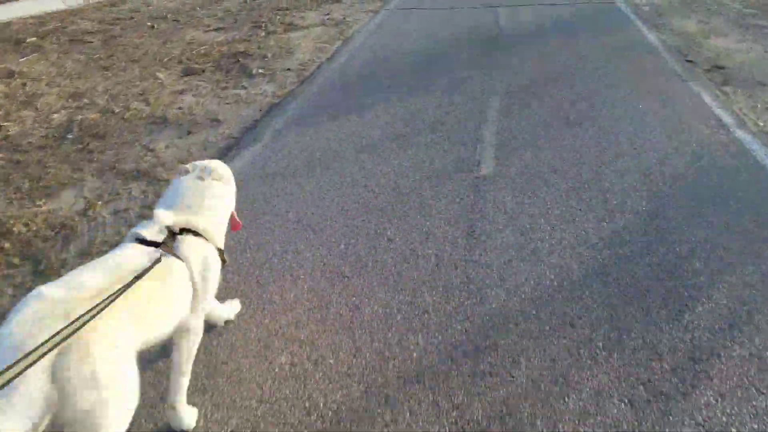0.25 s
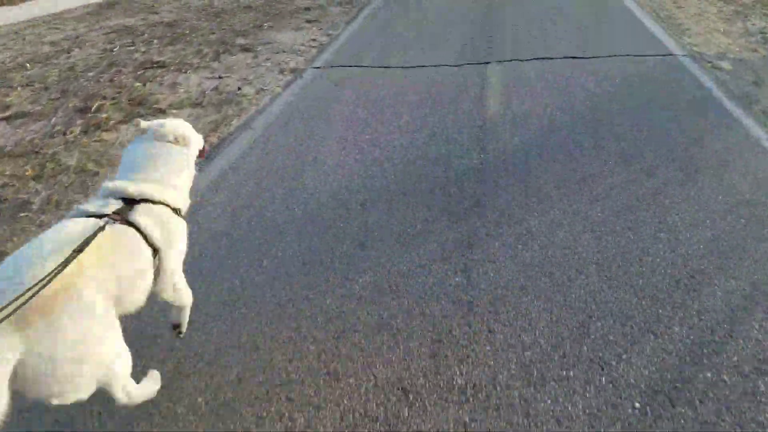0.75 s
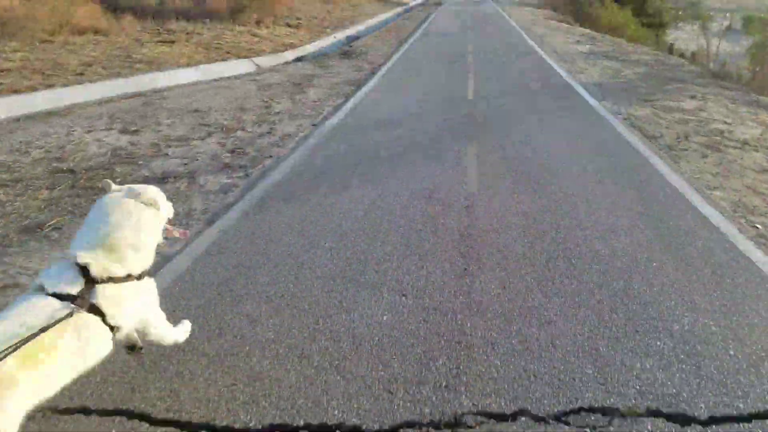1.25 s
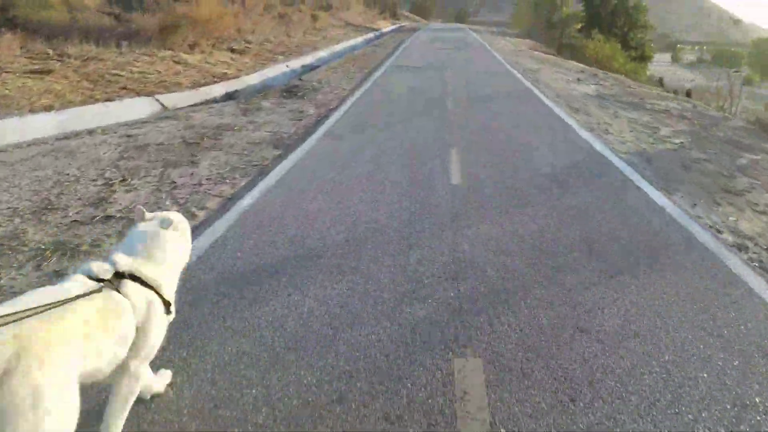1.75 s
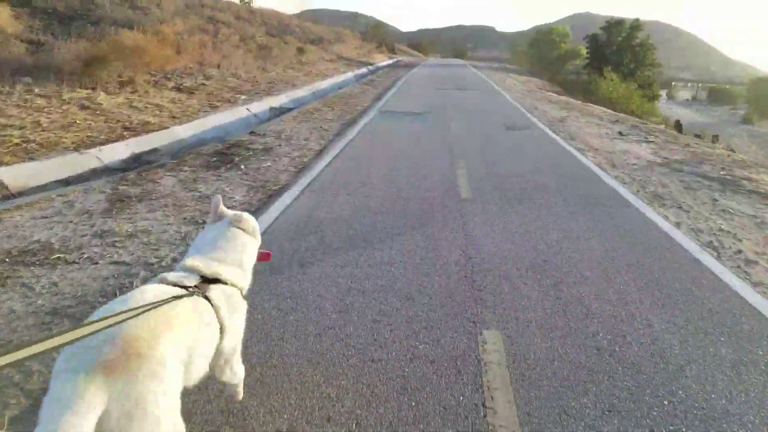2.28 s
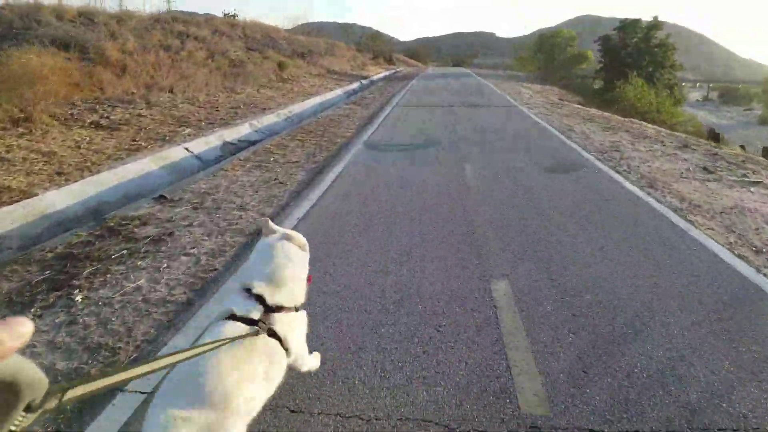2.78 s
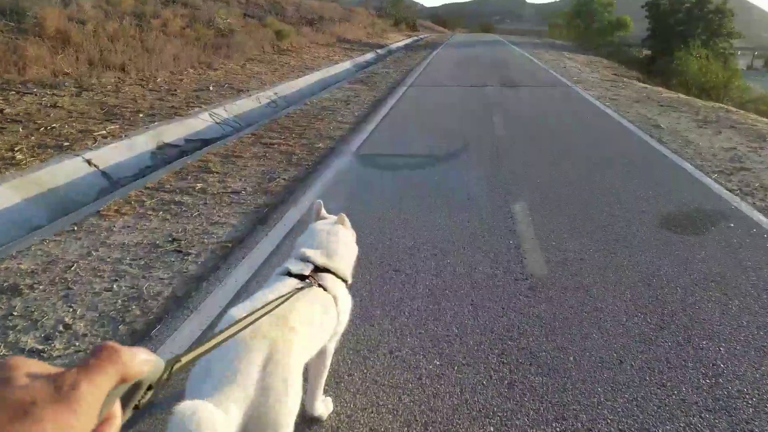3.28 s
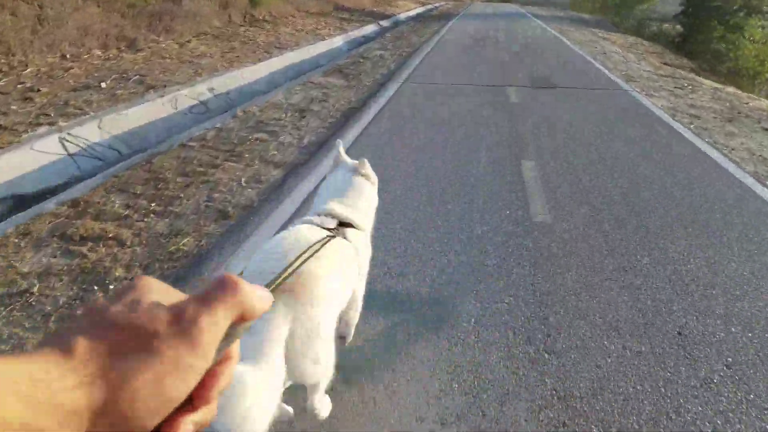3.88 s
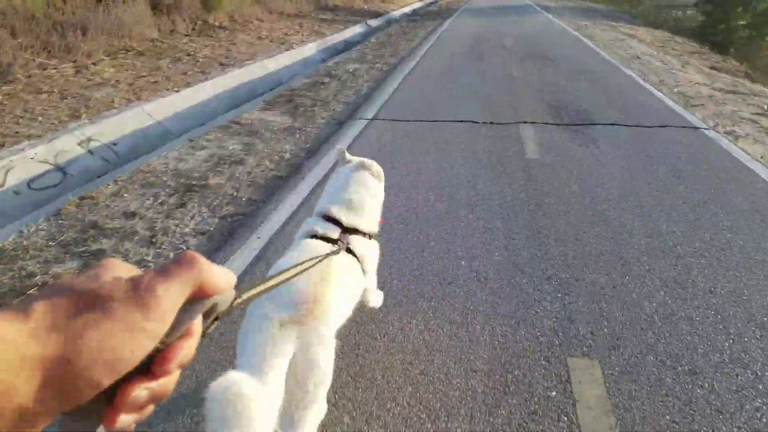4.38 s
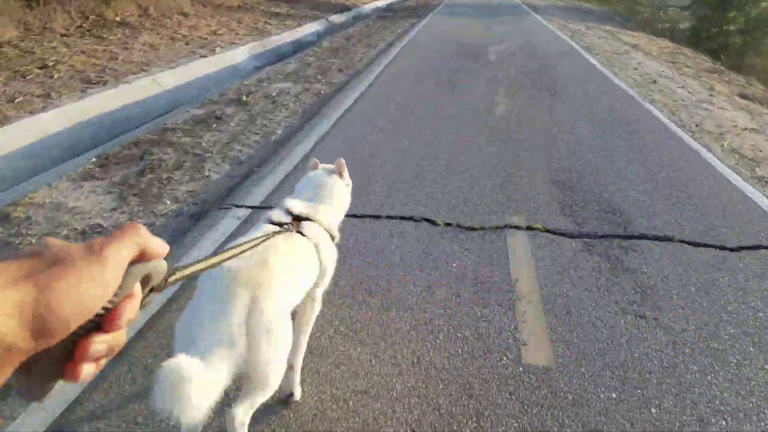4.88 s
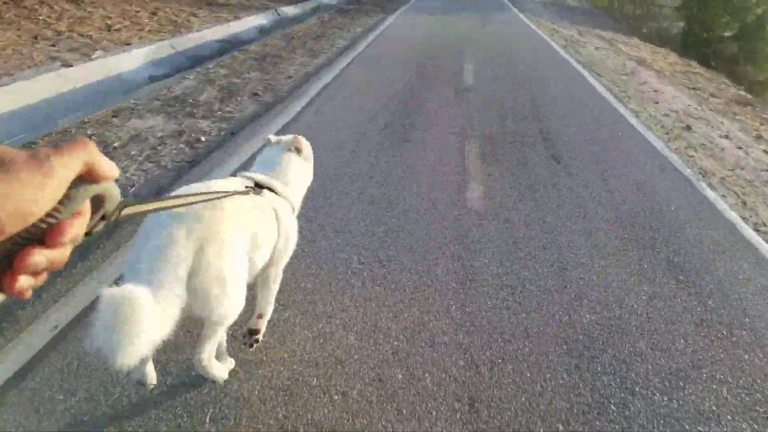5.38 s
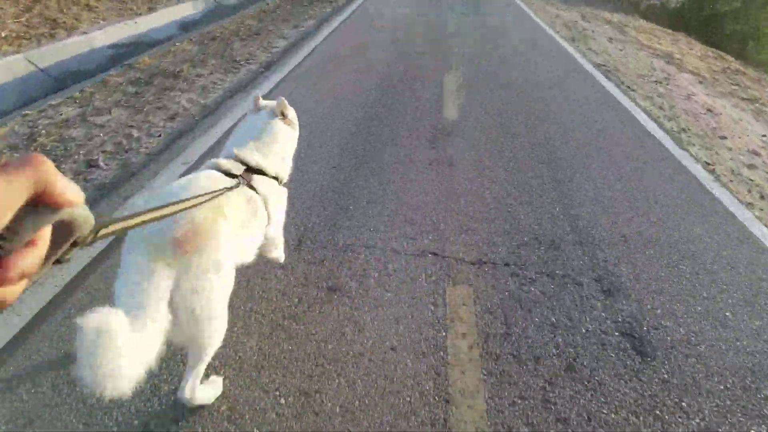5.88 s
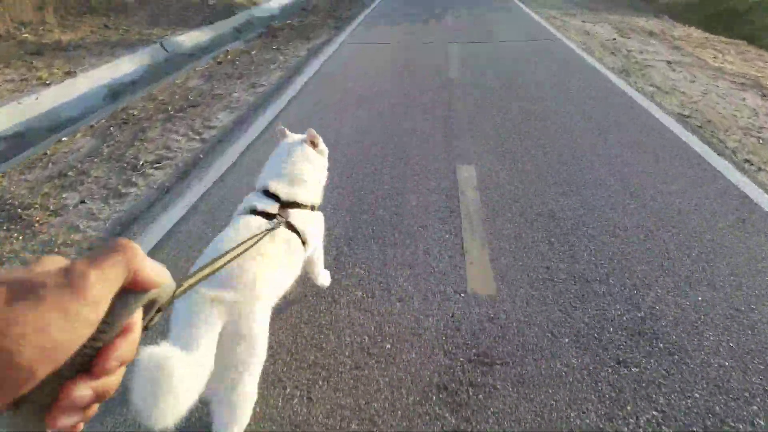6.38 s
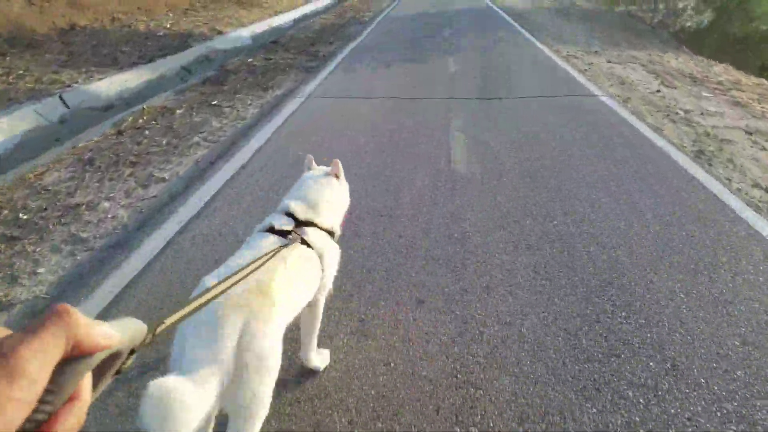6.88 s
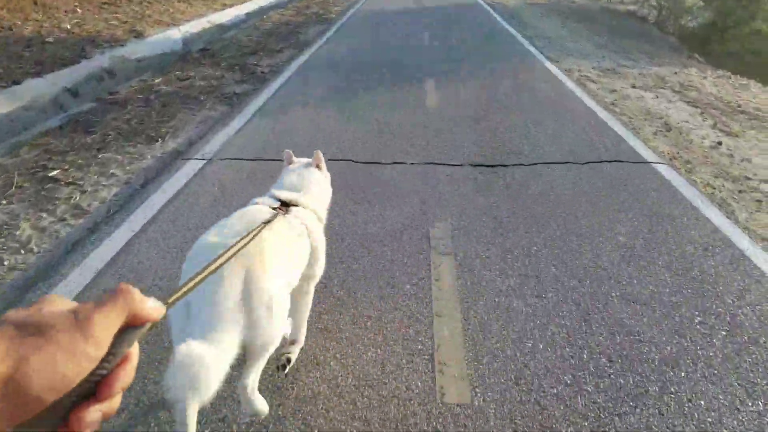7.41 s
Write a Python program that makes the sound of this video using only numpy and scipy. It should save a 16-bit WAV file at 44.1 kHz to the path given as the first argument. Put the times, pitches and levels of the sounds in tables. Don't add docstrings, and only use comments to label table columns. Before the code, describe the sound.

Longboard wheels rumble over coarse asphalt while gusty headwind thuds and crackles on the microphone, with small stone jolts, cracks and faint dog claws.

```python
import sys
import numpy as np
from scipy import signal
from scipy.io import wavfile
from scipy.ndimage import uniform_filter1d, minimum_filter1d

SR = 44100
rng = np.random.default_rng(int(sys.argv[2]) if len(sys.argv) > 2 else 0)


def master_out(mix):
    frames = np.transpose(np.atleast_2d(mix))
    ceiling = np.clip(frames, -1, 1)
    pcm = np.round(ceiling * 32767).astype(np.int16)
    wavfile.write(sys.argv[1], SR, pcm)


def voltage_ratio(decibels):
    exponent = np.asarray(decibels, float) / 20
    return 10 ** exponent


N = 337365
TIME = np.arange(N) / SR

# f/Hz, width/Hz, level/dB
DECK_MODES = [(225.2, 44, -2), (314, 98, -4.5), (447.7, 75.5, 1.5), (633, 106, -9.5), (772, 135, -14.5)]
# t/s, deck blow/dB, rattle/dB, time for the rattle to fall 60 dB/s
ROAD_CRACKS = [
    (0.735, -20, -22.5, 0.039),
    (0.7465, 8, -35.5, 0.069),
    (5.4975, -7, -28.5, 0.046),
    (5.503, 14.5, -33.5, 0.13),
    (5.512, -18, -31.5, 0.08),
    (5.652, 2, -40, 0.059),
    (5.673, 1.5, -47, 0.084),
]


def evened(x):
    return x / np.sqrt(np.mean(x ** 2, -1, keepdims=True) + 1e-20)


def read(points, hz):
    f, value = np.transpose(points)
    return np.interp(np.log(hz + 1), np.log(f + 1), value)


def curves(rows):
    s, *columns = np.transpose(rows)
    return np.array([np.interp(TIME, s, c) for c in columns])


def coloured(x, points, lo_hz, hi_hz):
    hz = abs(np.fft.fftfreq(8192, 1 / SR))
    log_gain = np.log(voltage_ratio(np.maximum(read(points, hz), -100)))
    taps = np.fft.ifft(np.exp(np.conj(signal.hilbert(log_gain)))).real[:4096]
    inside = np.mean(np.exp(2 * log_gain) * (hz > lo_hz) * (hz < hi_hz))
    return signal.oaconvolve(x, taps[None] / np.sqrt(inside), axes=1)[:, :N]


def resonate(x, hz, width):
    turn = np.exp(2j * np.pi * np.cumsum(hz * np.ones(N)) / SR)
    r = np.exp(-np.pi * width / SR)
    return 2 * (turn * signal.lfilter([1 - r], [1, -r], x / turn + 1e-18)).real


def lumps(per_s, channels):
    size = int(SR / per_s)
    noise = rng.standard_normal((channels, N))
    return evened(uniform_filter1d(uniform_filter1d(noise, size), size))


def bursts(s, db, t60, rise=0.00037):
    train = np.zeros(N)
    np.add.at(train, (np.array(s) * SR).astype(int), voltage_ratio(db))
    t = TIME[:SR // 4]
    return signal.oaconvolve(train, voltage_ratio(-60 * t / t60) * (1 - np.exp(-t / rise)))[:N]


def wavelets(rows, gain_db, cycles):
    out = np.zeros(N + SR)
    for (s, db, hz), turn in zip(rows, rng.random(len(rows))):
        u = np.arange(-cycles, 3.2 * cycles, hz / SR)
        at = max(int((s - cycles / hz) * SR), 0)
        reach = np.where(u < 0, cycles, 1.94 * cycles)
        swell = np.exp(-(2 * u / reach) ** 2)
        out[at:at + len(u)] += voltage_ratio(db + gain_db) * swell * np.cos(2 * np.pi * (u + turn))
    return out[:N]


def gust_strength(gusts):
    gusting = np.zeros(N)
    for s, length, db in gusts:
        span = slice(int(s * SR), int((s + length) * SR))
        gusting[span] += voltage_ratio(db) * signal.windows.tukey(span.stop - span.start, .7)
    return gusting


def wind():
    # t/s, left level/dB, right level/dB
    headwind = [(0.0, -30, -17.5), (0.55, -34.5, -23.5), (0.95, -10.5, -17), (1.2, -21, -18),
                (1.5, -15, -31.5), (1.85, -22.5, -16.5), (2.1, -19.5, -22.5), (2.5, -14, -22),
                (3.0, -16.5, -19), (3.6, -23, -25.5), (4.55, -21.5, -29), (5.35, -17, -14.5),
                (5.65, -16.5, -28.5), (5.95, -23.5, -16), (6.3, -13.5, -24), (6.6, -25, -17),
                (7.05, -30, -19), (7.5, -22, -22)]
    # f/Hz, level per Hz/dB
    buffet_colour = [(20, -18), (45, -4), (90, 2), (150, -1), (260, -4.5), (500, -12.5), (900, -23.5),
                     (2000, -73)]
    eddy_colour = [(150, 5), (400, 10.5), (1000, 7.5), (2000, -9), (3000, -43.5), (4500, -59.5),
                   (7000, -71.5), (10000, -105.5)]
    snap_colour = [(300, -38.5), (800, -9.5), (1500, 14), (2400, 10), (3600, -10), (5000, -22), (8000, -38),
                   (11000, -55)]
    # t/s, level/dB
    pops_left = [(0.478, -5.5), (0.49, -8), (0.805, -14), (0.872, -5.5), (0.893, -12.5), (0.981, -8),
                 (1.027, -5), (1.044, -6), (1.061, -8), (1.079, -14), (1.085, -20), (1.102, -16),
                 (1.11, -24), (1.242, -2.5), (1.262, -9.5), (1.385, -21), (1.415, 1.5), (1.432, -21),
                 (1.636, -6.5), (1.668, -21), (1.675, -16), (1.699, -25), (1.787, -12.5), (1.902, -13),
                 (1.968, -7.5), (2.596, -16), (2.623, -15), (2.633, -13), (2.645, -20), (2.681, -10.5),
                 (2.968, -12.5), (2.981, -7), (3.018, -14.5), (3.087, -13), (3.131, -9), (3.139, -12),
                 (3.325, -16), (3.385, -15.5), (3.5, -7), (3.75, -19), (3.759, -16), (4.063, -22),
                 (4.18, -17.5), (4.231, -23), (4.366, -13.5), (4.42, -18), (5.343, -13), (5.372, -14),
                 (5.689, -14), (5.726, -12.5), (6.198, -29), (6.213, -21), (6.233, -9), (6.285, -9),
                 (6.299, -17), (6.309, -8), (6.319, -7), (6.392, -17), (6.413, -23), (6.627, -22)]
    pops_right = [(0.054, -12.5), (0.067, -19), (0.074, -34), (0.168, -22), (0.178, -22), (0.19, -21),
                  (0.317, -22.5), (0.445, -27), (0.75, -20), (0.913, -10), (1.153, -22), (1.171, -22),
                  (1.205, -13), (1.225, -24), (1.269, -25), (1.711, -20), (1.736, -33), (1.75, -19),
                  (1.846, -13), (1.911, -18.5), (1.946, -11), (2.159, -21), (2.437, -15), (2.459, -16),
                  (2.478, -23), (2.484, -24), (2.5, -27), (2.794, -22.5), (3.053, -18), (3.095, -14.5),
                  (5.242, -17), (5.281, -17.5), (5.778, -20), (5.83, -25), (5.877, -14), (5.895, -19),
                  (5.95, -14.5), (5.973, -18), (5.987, -28), (6.007, -34), (6.044, -29), (6.124, -19),
                  (6.698, -26.5), (6.534, -22), (6.641, -19), (6.664, -28), (6.673, -11), (6.721, -26),
                  (6.735, -13), (6.758, -20.0), (6.773, -28), (6.788, -28), (6.745, -25), (6.807, -9),
                  (6.832, -19), (6.881, -22), (6.92, -24.5), (6.958, -18), (6.971, -26), (7.02, -28)]
    # t/s, level/dB
    pops_more = [
        [(0.852, -9), (0.919, -11), (0.972, -7), (1.01, -13), (1.816, -18), (2.335, -14), (2.48, -20), (2.549, -11.5), (5.497, -11), (5.522, -14), (5.565, -14), (5.624, -18), (5.653, -20)],
        [(0.845, -19.5), (0.871, -15), (2.544, -24), (3.12, -14.5), (5.497, -11), (5.522, -12), (5.653, -20), (5.735, -23)],
    ]
    # start t/s, length/s, level/dB
    gusts_left = [(0.88, 0.27, -29.5), (.966, 0.024, -18), (1.02, 0.11, -11.5), (1.066, 0.043, -19.5),
                  (1.226, 0.036, -13), (1.375, 0.011, -27), (1.424, 0.023, -16.5), (1.63, 0.11, -21),
                  (2.26, 0.22, -38.5), (2.7, 0.5, -47.5), (1.74, 0.32, -38.5), (.76, 0.16, -28.5),
                  (2.46, 0.036, -28), (2.58, 0.11, -21), (2.94, 0.1, -24.5), (3.08, 0.091, -24),
                  (4.05, 0.021, -38), (4.17, 0.035, -44), (4.225, 0.016, -30.5), (4.86, 0.047, -40),
                  (5.0, 0.12, -48), (5.36, 0.035, -31.5), (5.61, 0.18, -30.5), (6.17, 0.098, -25),
                  (6.275, 0.05, -21), (6.37, 0.049, -34.5), (6.6, 0.051, -47)]
    gusts_right = [(0.0, 0.12, -37), (.14, 0.1, -42), (.8, 0.3, -44), (1.12, 0.24, -39),
                   (2.42, 0.15, -33.5), (3.04, 0.073, -36.5), (5.2, 0.3, -47), (5.7, 0.14, -36),
                   (5.85, 0.38, -42.5), (6.62, 0.16, -49), (6.7, 0.13, -30.5), (6.84, 0.061, -45)]
    # t/s, level/dB
    shoves = [(0.458, -9), (2.37, -14), (3.47, -8), (4.04, -14.5), (4.27, -17), (4.401, -4.5), (4.58, -13),
              (4.769, -4), (5.0, -11), (5.44, -20.5), (7.33, -11.5)]

    wind_db = curves(headwind)
    level = voltage_ratio(wind_db)
    buffet = rng.standard_normal((2, N)) * voltage_ratio(2.0 * lumps(28, channels=2) + 0.68 * lumps(22, channels=2))
    clumps = evened(voltage_ratio(4.5 * lumps(200, channels=2) + 2.2 * lumps(40, channels=2)))
    force = clumps * voltage_ratio(-50 + 1.7 * (wind_db + 20) + 5.7 * lumps(21, channels=2))
    cores = np.zeros((2, N))
    ports = (gusts_left, pops_left + pops_more[0]), (gusts_right, pops_right + pops_more[1])
    for port, (gusts, pops) in enumerate(ports):
        gusting = gust_strength(gusts)
        shed = np.floor(np.cumsum(75 / SR * clumps[1 - port]))
        at = np.flatnonzero((np.diff(shed) > 0) & (gusting[1:] > 1e-4))
        gust_db = 20 * np.log10(gusting[at])
        size_db = 0.7 * (gust_db + 27) - 21 + 3 * rng.standard_normal(N)[at]
        scrape = 0.57 * gusting * clumps[port] ** .5
        force[port] += scrape + bursts(at / SR, size_db, 0.017, 0.0012)
        cores[port, at + 40] = -voltage_ratio(size_db + 11.5)
        s, db = np.transpose(pops)
        force[port] += bursts(s - .002, db + 10, 0.015, 0.0059)
        level[port] += bursts(s - 0.04, db + 3, 0.039, 0.04)
        cores[port, (s * SR).astype(int) + 60] = -voltage_ratio(db + 14.0)
    level[0] += bursts(*np.transpose(shoves), 0.18, 0.0061)

    spikes = rng.random((2, N)) < 2500 / SR
    small = evened(rng.standard_normal((2, N)) * (.2 + spikes)) * force + cores
    hard = small * np.sqrt(abs(force)) * voltage_ratio(-0.5)
    hard[:, 1:] += voltage_ratio(11.5) * np.diff((small - cores) * uniform_filter1d(abs(force), size=900))
    soft = small / np.sqrt(1 + abs(force) / voltage_ratio(-33.5))
    low = coloured(buffet * level, buffet_colour, 30, 170)
    return low + coloured(soft, eddy_colour, 1238, 2400) + coloured(hard, snap_colour, 600, 3500)


def deck(drive):
    out = 0
    for k, (hz, width, db) in enumerate(DECK_MODES):
        mode = signal.iirpeak(hz, hz / (1.7 * width), SR)
        twice = signal.lfilter(*mode, signal.lfilter(*mode, drive))
        out = out + (-1) ** k * voltage_ratio(db) * twice / np.sqrt(width)
    return out


def knocks():
    t = TIME[:SR // 4]
    ring = 0
    for hz, width, db in DECK_MODES:
        fade = np.exp(-np.pi * .35 * width * t)
        ring = ring + voltage_ratio(db) * (hz / 440) ** 1.3 * np.sin(2 * np.pi * hz * t) * fade
    blows = np.zeros(N)
    for s, db, _, _ in ROAD_CRACKS:
        blows[int(s * SR)] = voltage_ratio(db - 19.5)
    return signal.oaconvolve(blows, ring)[:N]


def hiss(level_db):
    # f/Hz, level per Hz/dB
    hiss_colour = [(530, -37.5), (900, -3), (1080, -4.5), (1450, -10.5), (2450, -11.5), (3180, -20.5),
                   (3500, -17.5), (4770, -20), (5510, -25), (7300, -26.5), (9500, -40), (11800, -34),
                   (14200, -31), (15400, -51.5)]
    # f/Hz, left minus right/dB
    hiss_side = [(900, -2), (2000, 2), (3300, -5.5), (5500, -7.5), (7500, -2.5), (9500, 13.5),
                 (15000, -1.5)]
    # f/Hz, likeness (1 = the same)
    hiss_same = [(900, 0.79), (2000, 0.44), (3300, 0.13), (6000, 0.1), (15000, 0.2)]

    frames, hz = N // 128 + 5, np.fft.rfftfreq(512, 1 / SR)
    a, b, c, d, patches = rng.standard_normal((frames, 257, 5)).T
    patches = uniform_filter1d(uniform_filter1d(patches, size=6, axis=0), size=16, axis=1)
    flicker = evened(np.minimum(rng.exponential(1, frames), 4) - 1)
    same = np.clip(read(hiss_same, hz), -1, 1)[:, None]
    left = a + 1j * b
    lag = np.exp(-2j * np.pi * hz * 4 / SR)[:, None]
    right = (same * left + np.sqrt(1 - same ** 2) * (c + 1j * d)) * lag
    z = np.array([left, right])
    z *= voltage_ratio(read(hiss_colour, hz)[:, None] + 2.1 * patches / patches.std() + 2.3 * flicker)
    z /= np.sqrt(np.mean(abs(z[:, (hz > 3500) & (hz < 7500)]) ** 2))
    z *= voltage_ratio(np.outer([.5, -.5], read(hiss_side, hz)))[..., None]
    noise = signal.istft(z, nperseg=512, noverlap=384)[1][:, :N]
    return noise * voltage_ratio(level_db - 11)


def board():
    # t/s, level/dB
    roll = [(0.0, -22), (0.3, -23), (0.72, -16.5), (1.0, -22), (1.45, -23.5), (2.05, -22), (2.3, -19),
            (2.75, -19), (3.2, -22), (3.75, -19.5), (4.2, -21.5), (4.9, -17), (5.2, -17), (5.68, -20),
            (5.8, -27.5), (6.3, -27), (6.8, -27), (7.4, -24.5)]
    # middle t/s, length/s, added level/dB
    sand = [
        (2.29, 0.16, 1),
        (6.308, 0.16, -5),
        (7.026, 0.11, 5.5),
        (7.287, 0.24, 5),
    ]

    rumble_db = curves(roll)[0]
    grit = rng.standard_normal((2, N)) * voltage_ratio(1.38 * lumps(91, channels=1))
    s, db, _, _ = np.transpose(ROAD_CRACKS)
    shudder = bursts(s, db - 20, 0.07)
    sand_db = sum(db * np.exp(-(2 * (TIME - s) / length) ** 2) for s, length, db in sand)
    common = evened(deck(grit[0])) * (voltage_ratio(rumble_db + 3.0) + shudder) + knocks()
    apart = 0.11 * evened(deck(grit[1])) * voltage_ratio(rumble_db)
    late = np.roll(common, 5)
    shaking = np.array([common * voltage_ratio(0.6) + apart, late - apart])
    return shaking + hiss(-54 + 0.77 * (rumble_db + 22.5) + sand_db)


def stones():
    # t/s, peak level/dB, f/Hz
    pebbles = [(0.2006, -36, 2111), (0.5869, -31, 2331), (0.736, -38, 2400), (0.7485, -32, 2528),
               (0.9438, -34, 1895), (1.4155, -15.5, 2260), (1.4168, -19.5, 2250), (2.4601, -37, 1863),
               (2.8812, -32, 1940), (3.5295, -28.5, 2174), (3.566, -33, 2164), (3.5801, -35, 2255),
               (3.6651, -33, 2185), (3.9185, -36, 2390), (3.947, -27.5, 2190), (3.9714, -32, 2213),
               (4.0731, -33, 2090), (4.0848, -33, 2375), (4.2123, -39, 2136), (4.4807, -34, 2005),
               (4.5784, -31, 2097), (4.6306, -35, 1942), (4.6717, -32, 2149), (4.6926, -35, 2044),
               (4.7192, -32, 2287), (4.8497, -31, 2185), (4.8717, -31, 2045), (4.8885, -23.5, 1969),
               (4.9526, -35, 2063), (4.9924, -31, 2072), (5.1841, -29, 2027), (5.2107, -33, 2084),
               (5.4629, -31.5, 1873), (5.4985, -20.5, 1400), (5.5219, -28, 1847), (5.505, -26, 2600),
               (5.6539, -21, 2040), (7.471, -31, 2650)]
    # t/s, peak level/dB
    jolts = [(0.209, -14), (0.605, -2), (0.933, -7), (1.08, -6), (1.189, -7), (1.315, -13), (1.607, -5),
             (1.658, -22), (1.772, -4.5), (1.912, -6.5), (1.971, -10), (2.032, -4), (2.197, -4.5),
             (2.371, -13), (2.424, -12), (2.549, -10), (2.76, -17.5), (2.841, -4.5), (3.03, -5.5),
             (3.089, -6), (3.16, -21), (3.258, -6.5), (3.327, -4.5), (3.438, -3.5), (3.68, -3),
             (3.874, -10), (3.945, -4.5), (4.105, -2.5), (4.151, -7), (4.245, -5.5), (4.33, -9),
             (4.414, -7), (4.561, -8), (4.822, -20.5), (4.889, -8), (4.93, -1.5), (5.082, -23),
             (5.175, -18), (5.371, -7), (5.672, -9), (6.319, -21), (6.748, -7), (7.286, -12), (7.33, -6),
             (7.415, -9)]

    detune = 1 + 0.042 * rng.standard_normal(len(jolts))
    tuned = [(s, db, 439.6 * d) for (s, db), d in zip(jolts, detune)]
    both = wavelets(pebbles, gain_db=7.5, cycles=1.6) + wavelets(tuned, gain_db=-6.5, cycles=4.6)
    return np.array([both * voltage_ratio(0.7), np.roll(both, 5)])


def dog():
    # t/s, level/dB
    claws = [(0.2353, -44.5), (0.2962, -44), (0.326, -51), (0.363, -52.5), (0.4775, -46), (0.5666, -45),
             (0.672, -46), (0.717, -38), (0.732, -34), (0.8263, -50), (0.8325, -46), (0.853, -42.5),
             (1.4152, -42.5), (1.488, -52), (1.581, -54), (1.6571, -41.5), (1.6854, -41.5), (1.7135, -51.5),
             (1.8415, -42), (1.973, -51), (2.068, -47), (2.371, -42), (2.588, -41.5), (2.6638, -49),
             (2.467, -46.5), (2.764, -44), (2.8617, -43), (2.8924, -41.5), (2.9921, -44.5), (3.012, -51),
             (3.0882, -45.5), (3.1712, -47), (3.3558, -56), (3.372, -46), (3.3895, -44.5), (3.5676, -46),
             (3.6608, -46), (3.7276, -50), (3.7903, -46), (4.0482, -51), (4.2622, -51.5), (4.579, -47),
             (4.6889, -44), (4.7456, -44), (4.8562, -47.5), (4.9484, -40.5), (5.036, -47), (5.3503, -42),
             (5.3887, -48), (5.4607, -44.5), (5.4834, -40.5), (5.498, -29.5), (6.1594, -45.5), (6.696, -47),
             (7.4084, -44), (7.439, -45), (7.6338, -46)]
    # f/Hz, level per Hz/dB
    claw_colour = [(1500, -16), (2500, -4), (5000, 3), (8000, -4.5), (10500, -4), (13500, 6.5),
                   (15300, -18.5)]
    # t/s, level/dB, low pitch relative to the high one/dB
    chinks = [
        (0.3636, -52.5, -19),
        (1.488, -49.5, -1),
        (2.6624, -52.5, -7),
        (3.0878, -54.5, -8),
        (4.262, -47, -11),
        (6.6962, -46, -15),
    ]
    # f/Hz, time to fall 60 dB/s
    tag = [(5720, 0.17), (13600, 0.077)]

    s, db = np.transpose(claws)
    ticks = bursts(s, db + 4, 0.0079, 0.00039) * voltage_ratio([[1.75], [-1.75]])
    puff = rng.standard_normal(N)
    puff[(s * SR).astype(int) + 15] = 4.0
    noise = np.array([puff, np.roll(puff, 8)]) + .5 * rng.standard_normal((2, N))
    out = coloured(ticks * noise, claw_colour, 5800, 18000)
    s, db, low_db = np.transpose(chinks)
    for (hz, t60), level_db in zip(tag, (db + low_db, db)):
        twin = .6 * np.sin(2 * np.pi * hz * .985 * TIME)
        out += bursts(s, level_db, t60) * (np.sin(2 * np.pi * hz * TIME) + twin)
    return out


def thuds():
    # t/s, peak level/dB, f/Hz
    thuds_left = [(0.342, -2, 191), (0.484, -11, 142), (0.964, -1, 129), (1.031, -7, 123), (1.419, -4, 170),
                  (1.56, -5, 182), (2.4, -1, 139), (2.468, -4, 148), (2.884, -9, 153), (2.944, 0, 153),
                  (3.497, -1, 165), (3.546, -6, 162), (3.764, -1.5, 145), (3.933, -1.5, 184),
                  (4.018, -3, 159), (4.076, 3.5, 139), (4.435, -7, 140), (4.608, -2, 158), (4.759, -3, 150),
                  (4.796, -1, 186), (4.817, 1, 151), (4.964, 1, 184), (5.007, -3, 144), (5.205, -2, 181),
                  (5.416, -2, 137), (5.451, -15, 136), (5.628, -9, 134), (5.736, 2, 177), (6.289, -5, 155),
                  (6.369, 0, 162), (6.56, 0, 166), (7.032, -5, 142), (7.089, -6, 161)]
    thuds_right = [(0.463, -4, 144), (0.587, -3.5, 133), (0.749, -0.5, 163), (0.839, 2, 111.5),
                   (0.941, -3, 161), (1.129, -1, 148), (1.185, 5, 173), (1.28, -6, 187), (2.02, 3, 176),
                   (2.194, -7, 154), (2.442, 5, 160.5), (2.477, -11, 178), (2.499, -1, 131),
                   (2.691, -7, 179), (2.774, 0.5, 174), (3.082, -5, 141), (3.402, -4, 157),
                   (3.781, -8, 185), (4.357, -4, 115), (5.023, -9, 170), (5.196, -4, 168), (5.26, 0, 157),
                   (5.287, 5, 163), (5.399, 6.5, 155), (5.998, -6, 140), (6.108, 2.5, 141),
                   (6.186, -4, 151), (6.393, -10, 172), (6.513, 1.5, 149), (6.675, -1, 149),
                   (6.811, 2, 151), (6.955, 3, 149), (6.975, 0.5, 162), (7.017, 2.5, 160), (7.168, 6, 149),
                   (7.45, 4.5, 177),
                   (7.055, 1, 148),
        (7.104, -2, 129),
        (7.226, -2, 150),
        (7.415, -2, 170),
        (7.499, 0, 141),
        (7.629, 2, 130),
    ]
    ports = (thuds_left, thuds_right)
    return np.array([wavelets(rows, gain_db=-3.5, cycles=0.97) for rows in ports])


def rattle():
    # f/Hz, level per Hz/dB
    rattle_colour = [(600, 0.5), (1500, -6), (3000, -7.5), (5000, -11), (8000, -21), (10500, -34),
                     (13500, -18.5), (15300, -38)]
    shake = sum(bursts([s], db, t60) for s, _, db, t60 in ROAD_CRACKS)
    noise = rng.standard_normal((2, N)) + 0.38 * rng.standard_normal(N)
    return coloured(noise * shake * voltage_ratio(1.3 * lumps(250, channels=1)), rattle_colour, 2100, 8000)


def whistle(rows, width, left_db):
    hz, db = curves(rows)
    on = (TIME > rows[0][0]) & (TIME < rows[-1][0])
    band = resonate(resonate(rng.standard_normal(N), hz, width), hz, width)
    return evened(band) * voltage_ratio(db) * on * voltage_ratio([[left_db], [-left_db]])


def bearings():
    # t/s, f/Hz, level/dB
    whine = [
        (2.05, 3620, -66),
        (2.2, 3480, -56),
        (2.32, 3680, -58),
        (2.42, 3790, -55),
        (2.55, 3960, -54.5),
        (2.68, 4020, -66),
    ]
    # t/s, f/Hz, level/dB
    squeak = [
        (7.43, 2650, -60),
        (7.47, 2720, -49),
        (7.53, 2600, -57),
    ]
    # t/s, f/Hz, level/dB
    drone = [
        (3.15, 2300, -57.5),
        (3.9, 2270, -55),
        (4.9, 1970, -51.5),
        (5.45, 2020, -58.5),
    ]
    singing = whistle(whine, 200, -2.8) + whistle(squeak, 160, -2.5)
    return singing + whistle(drone, 600, 1.5) * voltage_ratio(5.2 * lumps(160, channels=1))


def scene():
    singing = bearings()
    return wind() + board() + rattle() + dog() + singing + thuds() + stones()


def thinned(x):
    # f/Hz, limit relative to the 5-7 kHz hiss/dB
    kept_above = [(6000, -22), (7600, -4), (8300, -2), (9800, -6.5), (11200, -3.5), (12000, -7),
                  (13600, -9), (14600, -11), (15300, -4)]

    hz, _, z = signal.stft(np.pad(x, ((0, 0), (498, 0))), SR, "cosine", 2048, 1024)
    power = np.add.reduceat(abs(z) ** 2, np.arange(0, len(hz), 3), axis=1) / 3
    power = power[:, np.arange(len(hz)) // 3]
    steady = signal.medfilt(power[:, (hz > 5000) & (hz < 7000)].mean((0, 1)), 15)
    lose = power < steady * voltage_ratio(read(kept_above, hz))[:, None] ** 2
    lost = signal.istft(z * lose, SR, "cosine", 2048, 1024)[1][:, 498:498 + N]
    click = uniform_filter1d(lost ** 2, size=96) > 4.5 * uniform_filter1d(lost ** 2, size=3000)
    spared = uniform_filter1d(-minimum_filter1d(-1. * click, size=700), size=64)
    return x - lost * (1 - voltage_ratio(-48) - spared)


def top_cut(x):
    return signal.sosfilt(signal.butter(12, 15690, fs=SR, output="sos"), x)


def record(dry):
    overloaded = np.tanh(dry * 0.79) / 1.009
    return top_cut(thinned(overloaded))


dry = scene()
out = record(dry)
master_out(out)
```